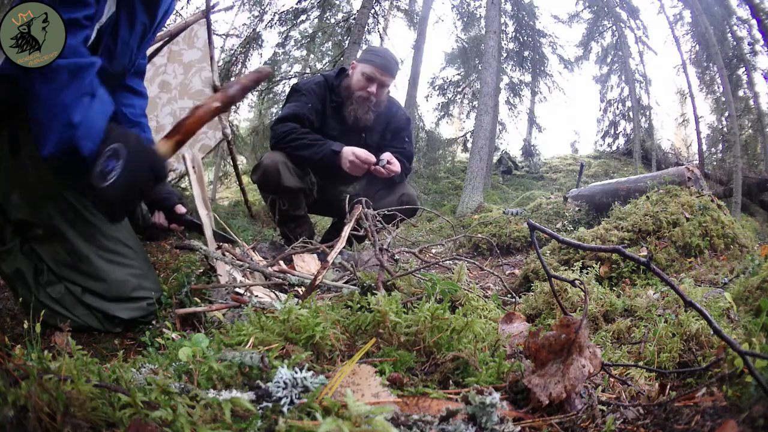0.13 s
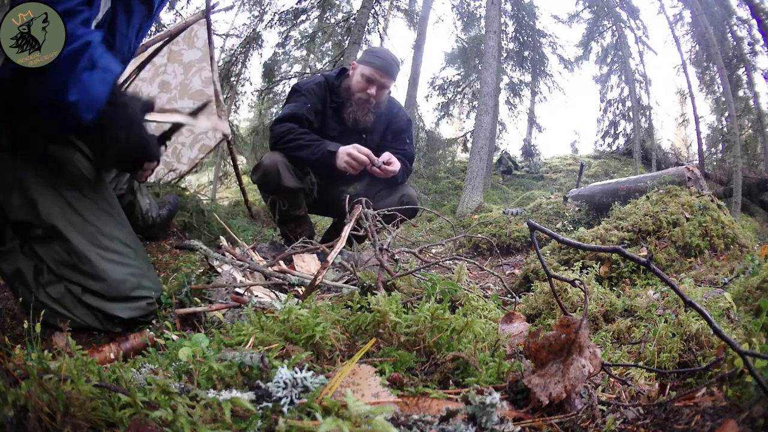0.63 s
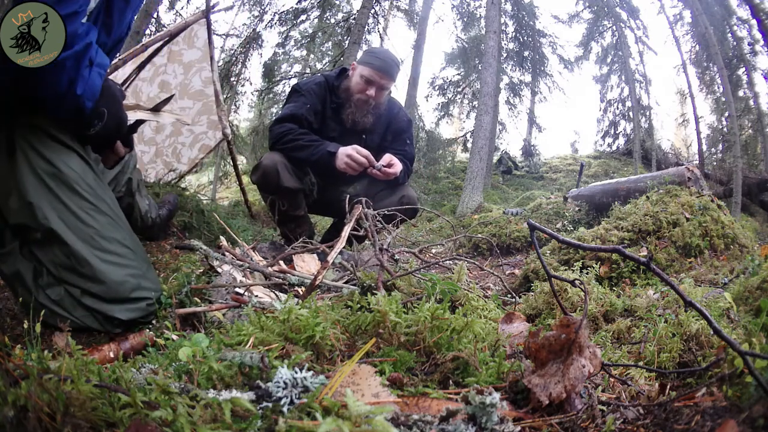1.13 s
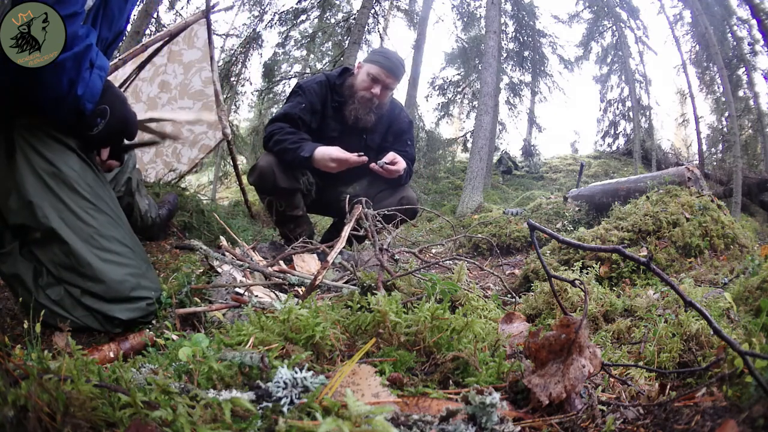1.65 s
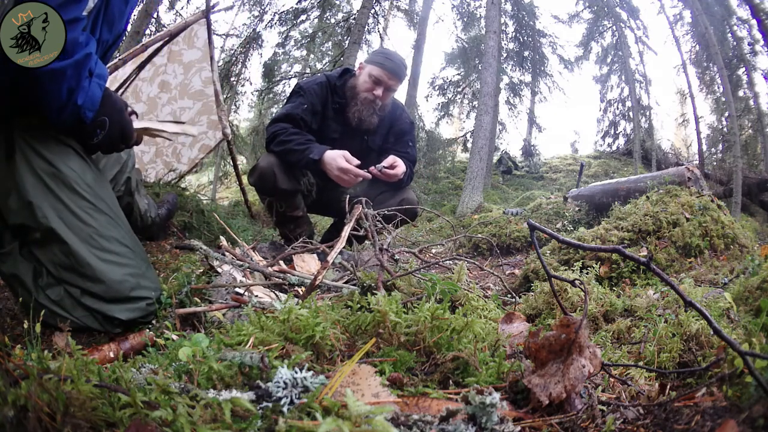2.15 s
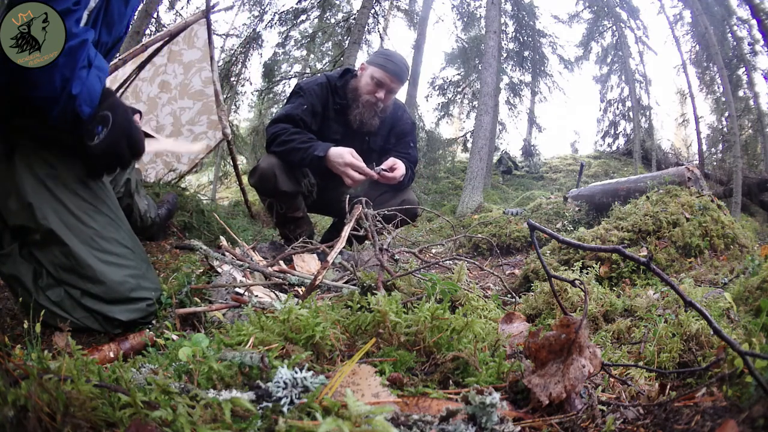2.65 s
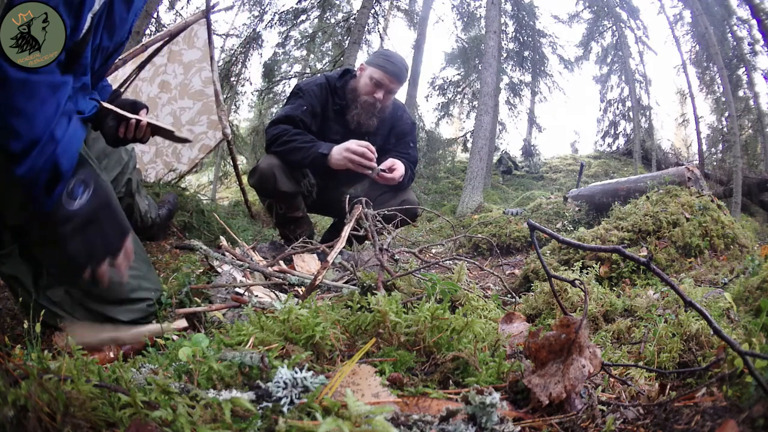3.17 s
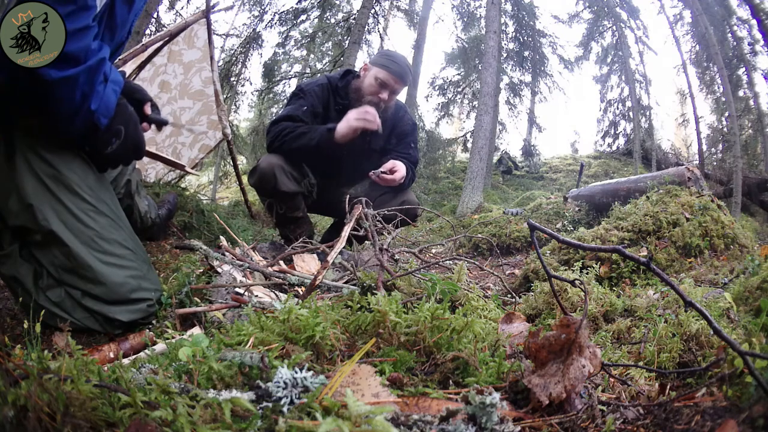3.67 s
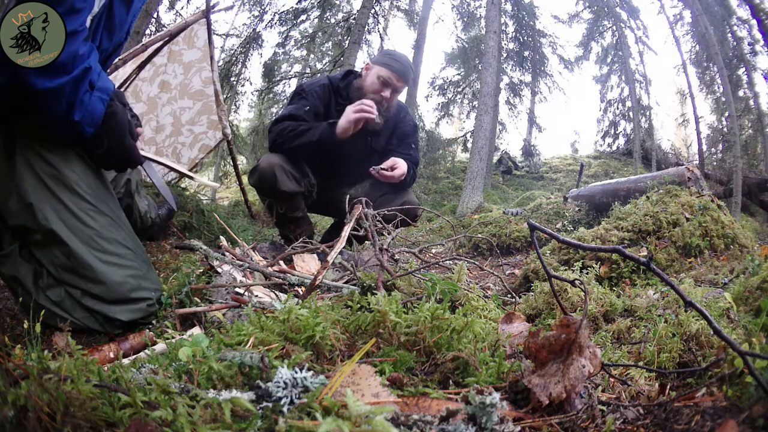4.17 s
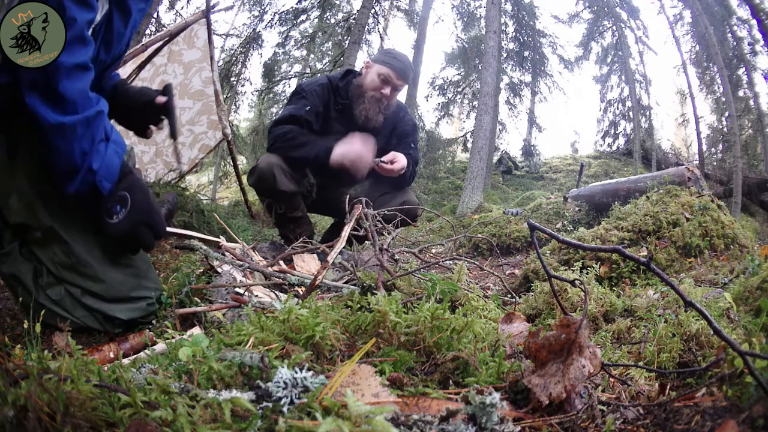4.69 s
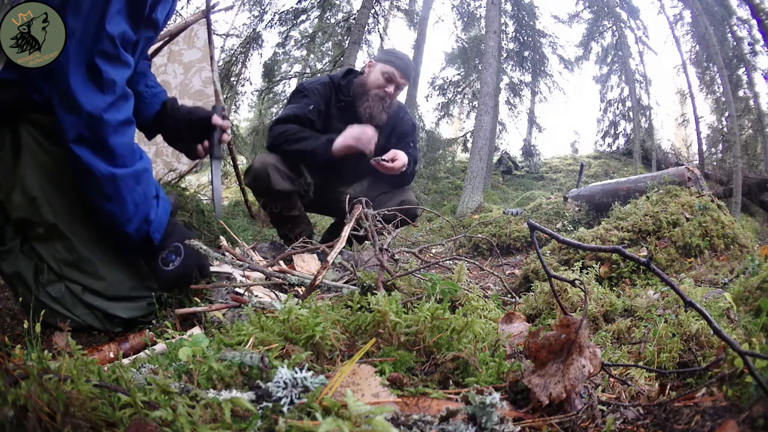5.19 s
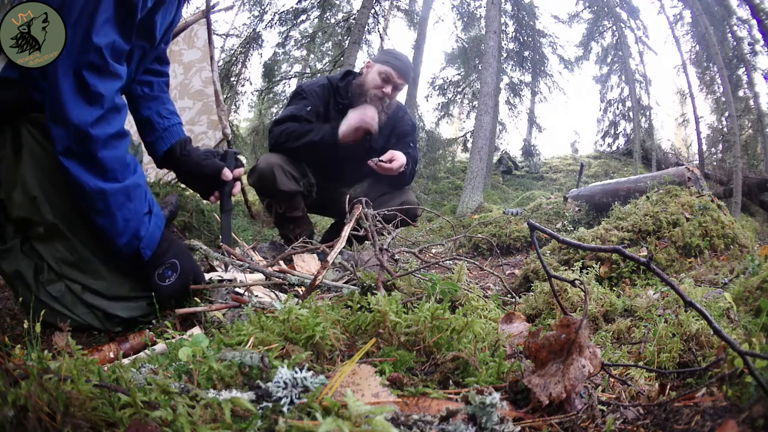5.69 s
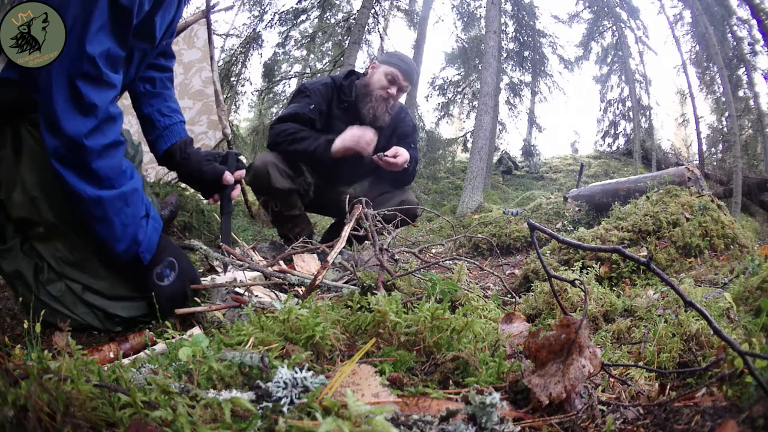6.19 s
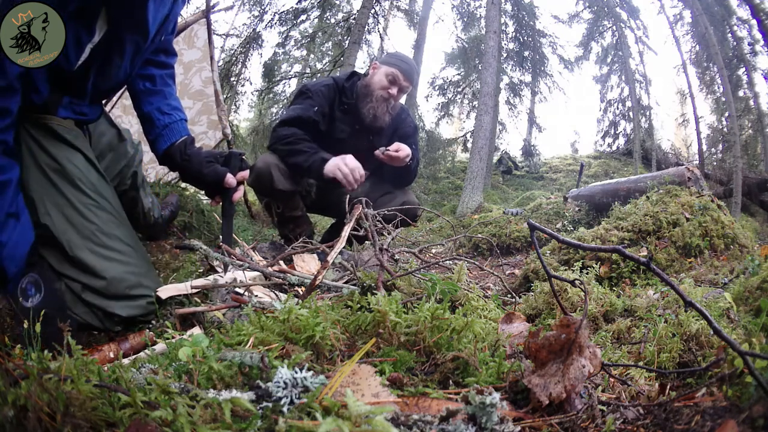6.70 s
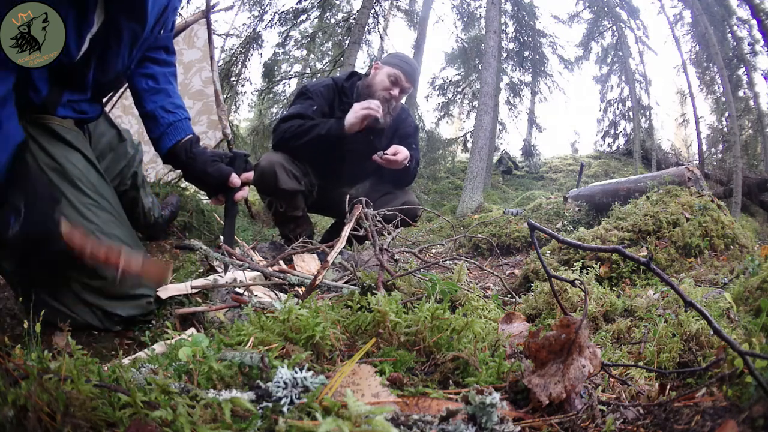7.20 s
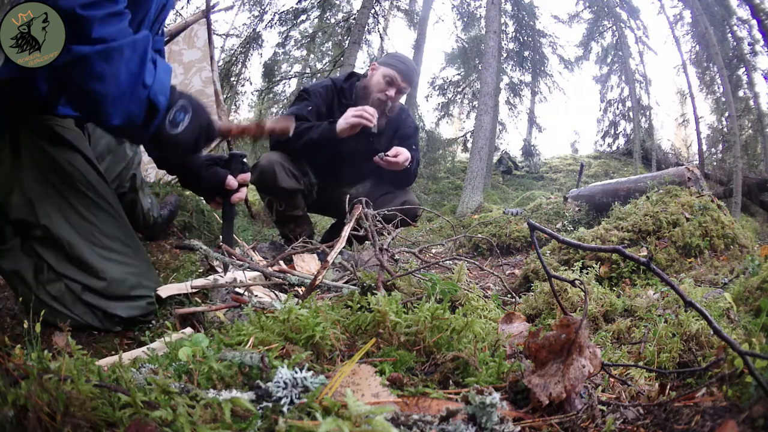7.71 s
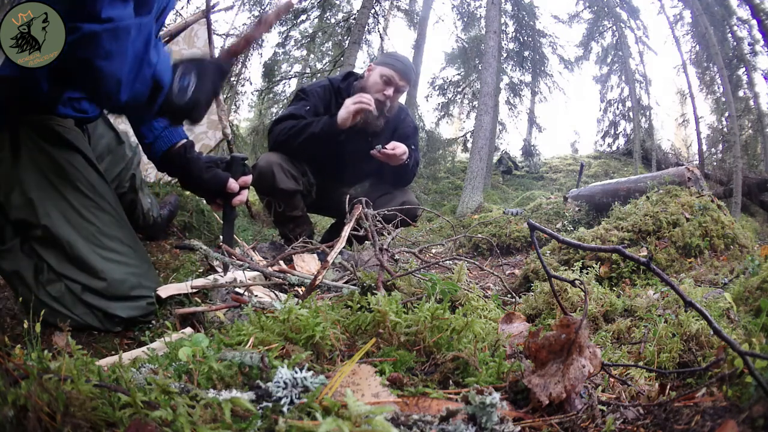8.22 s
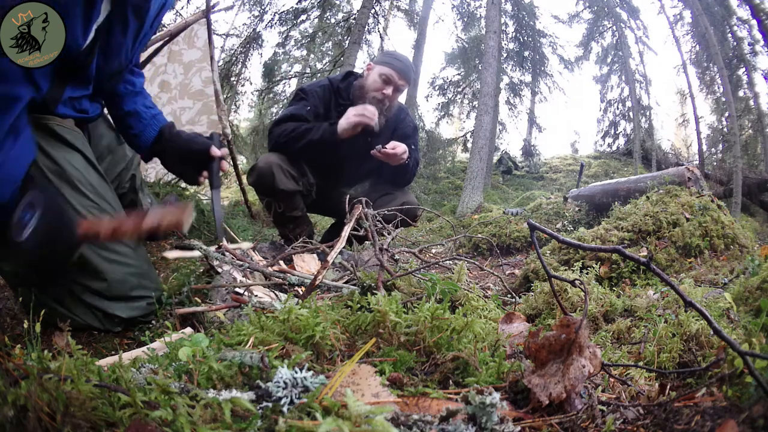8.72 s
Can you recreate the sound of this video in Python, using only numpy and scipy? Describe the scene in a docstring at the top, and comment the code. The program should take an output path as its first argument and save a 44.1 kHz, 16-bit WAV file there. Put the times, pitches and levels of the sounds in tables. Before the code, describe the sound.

A quiet forest heard very close, almost without echo. At first the hush is very faint, with jacket rustle and tiny ticks of fibres and sticks on the left at 0.1-1.2 s. A short tear ends in a loud, bright wood snap at 1.3 s, followed by small crackles and soft drops to 1.75 s. Hush and thin high hiss swell through a calm pause. At 2.97 s a dry stick knocks; around 3.3-3.45 s sticks clack and crackle. Steel scrapes a spark rod ahead at 3.9, 4.3 and 5.15 s, then about every 0.3 s from 5.5 to 7.35 s: hard, dry, bright clicks with a brief rasp. Sticks crack and drop between them, and cloth rustles most around 6.5 s. Three sharp baton blows on a knife hit left at 7.7, 8.0 and 8.4 s, the last tearing wood. Faint rustle and hiss return until about 9 s.

```python
"""A quiet forest, heard close to a fire maker: steel scrapes a spark rod ahead, a baton drives a knife through
kindling on the left, wood cracks and tears, sticks drop on moss and knock, jackets rustle.
Struck bodies are sums of damped modes, fractures are decaying bursts of uneven noise, and the hush,
cloth and hiss are shaped noise. The background drops at listed moments and climbs back at a steady
rate; each of two microphone ports resonates at its own pitches."""
import sys
import numpy as np
from scipy import signal
from scipy.fft import rfft, irfft, next_fast_len
from scipy.io import wavfile
from scipy.ndimage import uniform_filter1d, map_coordinates

SR = 44100
rng = np.random.default_rng(int(sys.argv[2]) if len(sys.argv) > 2 else 0)


def master(y):
    """Save y as 16-bit WAV."""
    cut = np.clip(np.atleast_2d(y).T, -1, 1)
    pcm = np.round(cut * 32767)  # scale
    wavfile.write(sys.argv[1], SR, pcm.astype(np.int16))


def gain_from_decibels(decibels):
    """Convert decibel values to linear amplitude factors."""
    exponent = np.asarray(decibels, float) / 20
    return 10 ** exponent


N = 390285
TIME = np.arange(N) / SR  # seconds, the whole scene
T = np.arange(SR // 5) / SR  # seconds, one short event


def unit(x):
    """Normalization: the signal is scaled to an rms of 1."""
    return x / np.sqrt(np.mean(x ** 2) + 1e-20)


def wobble(rate):
    """Slow random modulation: a smooth curve through random knots, rate knots a second."""
    knots = rng.standard_normal(int(N * rate / SR) + 4)
    return map_coordinates(knots, [np.arange(N) * rate / SR])


def filtered(x, response):
    """Linear filtering: the spectrum is multiplied by a complex response of frequency."""
    m = next_fast_len(N + 8192)
    return irfft(rfft(x, m) * response(np.fft.rfftfreq(m, 1 / SR)), m)[..., :N]


def band(x, low_hz, high_hz, order=2):
    """Causal band-pass filtering."""
    edges = [low_hz, min(high_hz, .49 * SR)]
    return signal.sosfilt(signal.butter(order, edges, "band", fs=SR, output="sos"), x)


def noise(spectrum, alike):
    """Partial coherence: shaped stereo noise of rms 1, alike being the power share common to both sides."""
    hz, db = np.transpose(spectrum)
    common, own = rng.standard_normal(N), rng.standard_normal((2, N))
    pair = np.sqrt(alike) * common + np.sqrt(1 - alike) * own
    return unit(filtered(pair, lambda f: gain_from_decibels(np.interp(np.log(f + 1), np.log(hz), db))))


def add(track, s, sound):
    """Superposition: a sound is summed into the track from time s in seconds."""
    part = track[round(s * SR):][:len(sound)]
    part += sound[:len(part)]


def ring(modes, attack):
    """Modal synthesis: damped sines of slightly random strength under a common attack in seconds."""
    tone = 0
    for hz, db, t60 in modes:
        tone = tone + gain_from_decibels(db + rng.normal() - 60 * T / t60) * np.sin(2 * np.pi * hz * T)
    return tone * (1 - np.exp(-T / attack))


def crackle(t60, rise, spiky_db):
    """Stochastic fracture: a dying burst of uneven impulses whose energy is set by its envelope alone."""
    shape = gain_from_decibels(-60 * T / t60) * (1 - np.exp(-T / rise))
    burst = shape * gain_from_decibels(spiky_db * rng.standard_normal(len(T))) * rng.standard_normal(len(T))
    return burst * np.linalg.norm(shape) / np.linalg.norm(burst)


# Drops of the background, mostly at strikes and blows.
# Each row: start in seconds, level just after in dB (0 = fully swollen).
DUCKS = [(0, -29), (1.308, -19), (3.888, -9), (4.339, -11), (4.6, -9.5), (5.149, -12), (5.498, -10),
         (5.824, -15), (6.147, -15.5), (6.449, -14), (6.75, -12.5), (7.044, -11.5), (7.354, -11.5),
         (7.725, -20), (8.033, -28.5), (8.378, -27.5)]


def swell_db():
    """Linear recovery: after each drop the level climbs at a constant dB rate up to 0 dB."""
    climb_db_per_s, smoothing_s = 10.5, .02
    s, after = np.transpose(DUCKS)
    last = np.clip(np.searchsorted(s, TIME) - 1, 0, None)
    level = np.minimum(0, after[last] + climb_db_per_s * (TIME - s[last]))
    return uniform_filter1d(level, round(smoothing_s * SR))


# Spectrum of the forest hush. Each row: frequency in Hz, relative density in dB per Hz.
HUSH_SPECTRUM = [(20, -44.5), (40, -11.5), (80, -13), (125, 0), (400, -4.5), (1200, -12), (2500, -21),
                 (6000, -35.5), (9000, -49)]
# Hush before the swell. Each row: time in seconds, level in dB.
BREEZE = [(0, -46.5), (1.2, -46), (1.6, -48), (2.9, -46), (3.25, -49.5), (3.8, -47), (4.3, -49),
          (4.6, -53.5), (5.1, -51), (5.6, -44), (6.1, -47.5), (6.45, -48.5), (7.0, -50), (7.7, -45.5),
          (8.0, -45.5), (8.29, -50.5), (8.45, -47.5), (8.85, -46.5)]


def forest_hush():
    """Broadband noise: a partly coherent hush follows a level curve with small random variations."""
    s, db = np.transpose(BREEZE)
    level_db = np.interp(TIME, s, db)
    return gain_from_decibels(level_db + 1.9 * wobble(10)) * noise(HUSH_SPECTRUM, alike=0.34)


# Spectrum of the fine swish of cloth. Each row: frequency in Hz, relative density in dB per Hz.
SWISH_SPECTRUM = [(1500, -20.5), (2500, 2), (5000, 3.5), (8000, -6), (12000, -12), (17000, -30.5)]
# Spectrum of the coarse folds. Each row: frequency in Hz, relative density in dB per Hz.
FOLDS_SPECTRUM = [(200, -27), (600, 0), (1300, -3), (2200, -6), (3500, -28.5)]
# Jacket movements before the swell. Each row: middle in seconds, length between the 1/e amplitude points
# in seconds, fine swish level in dB, coarse folds level in dB.
RUSTLES = [(.02, .15, -52, -46), (0.384, 0.038, -59, -46.5), (.62, .2, -50, -41.5), (0.902, .12, -61, -56),
           (1.08, 0.29, -60.5, -50.5), (1.75, .2, -56.5, -56), (2.45, .25, -71, -80),
           (2.276, 0.077, -62, -56), (2.9, .2, -66, -52.5), (3.33, .15, -58, -47), (3.617, .15, -70, -59.5),
           (3.86, .1, -56.5, -52.5), (4.31, .1, -54.5, -53), (4.448, 0.21, -53, -46.5),
           (4.634, 0.22, -54, -48.5), (4.865, 0.35, -53.5, -46.5), (5.096, 0.22, -52.5, -44),
           (5.23, .15, -58.5, -48), (5.55, .12, -59, -51.5), (5.8, .1, -66.5, -52),
           (6.436, 0.2, -45.5, -40), (6.522, 0.21, -45, -42), (6.86, .15, -49, -42.5),
           (7.23, .25, -54, -53), (7.505, 0.37, -59, -54), (7.668, 0.055, -50.5, -52),
           (7.92, .12, -60, -48.5), (8.6, .3, -57, -52)]


def jackets():
    """Friction noise: uneven grains under bell-shaped swells, whose powers add to a constant small shifting."""
    rest_swish_db, rest_folds_db = -67, -59
    power = gain_from_decibels([[2 * rest_swish_db], [2 * rest_folds_db]])
    for s, length, swish_db, folds_db in RUSTLES:
        bell = np.exp(-8 * ((TIME - s) / length) ** 2)
        power = power + gain_from_decibels([[2 * swish_db], [2 * folds_db]]) * bell
    swish, folds = np.sqrt(power)
    swish_grain_db, folds_grain_db = [1.4 * wobble(25) + 1.8 * wobble(98) for layer in range(2)]
    fine = swish * gain_from_decibels(swish_grain_db) * noise(SWISH_SPECTRUM, alike=0.071)
    return fine + folds * gain_from_decibels(folds_grain_db) * noise(FOLDS_SPECTRUM, alike=0.16)


def ambience():
    """Amplitude modulation: hush and cloth share one swelling level, a little stronger on the left."""
    return (forest_hush() + jackets()) * gain_from_decibels(swell_db() + [[1.2], [-1.2]])


# Spectrum of the electronics' hiss. Each row: frequency in Hz, relative density in dB per Hz.
HISS_SPECTRUM = [(2000, -27.5), (5000, 3), (7000, -7), (10000, -3.5), (12000, -3), (15600, -6.5),
                 (15900, -64)]


def electronics():
    """Electronic self-noise: nearly incoherent hiss and a thin 12 kHz whine share the swelling level."""
    whine = gain_from_decibels(-12 + 1.5 * wobble(1.5)) * np.sin(2 * np.pi * 12000 * TIME)
    tone_and_hiss = noise(HISS_SPECTRUM, alike=0.016) + whine * gain_from_decibels([[1.5], [-1.5]])
    return gain_from_decibels(swell_db() - 56) * tone_and_hiss


def fractures(rows):
    """Brittle fracture: each crack sums a bright snap, a longer woody body and a shorter treble spray."""
    snap, body, treble = np.zeros((3, N))
    for s, db, body_db, treble_db, t60 in rows:
        add(snap, s, gain_from_decibels(db - 5.0) * crackle(t60, rise=0.00046, spiky_db=6.5))
        add(body, s, gain_from_decibels(db + body_db + 11.0) * crackle(1.4 * t60, rise=0.00033, spiky_db=-1.5))
        add(treble, s, gain_from_decibels(db + treble_db + 7.5) * crackle(0.69 * t60, rise=0.0015, spiky_db=5))
    bright = band(snap, 4000, 5800) + gain_from_decibels(-3) * band(snap, 2000, 4000)
    return bright + band(body, 230, 1100) + band(treble, 4700, 12000, order=4)


# Fibres cracking and sticks ticking. Each row: start in seconds, relative level in dB, body in dB and
# treble in dB relative to it before fixed offsets, t60 of the snap in seconds.
CRACKS = [(0.118, -48, -34, -28, 0.017), (0.4983, -44, -15, -25, 0.054), (0.5745, -43.5, -13, -21, 0.072),
          (0.7733, -38, -11, -25, 0.017), (0.7842, -55.5, 10.5, -23, 0.078), (0.8138, -55, 2, -19, 0.077),
          (0.8883, -42.5, -17, -19, 0.014), (1.052, -44.5, -12, -29, 0.057),
          (1.244, -36, -25.5, -10.5, 0.029), (1.305, -7.5, -24.5, -16, 0.025),
          (1.317, -23.5, -6.5, -32, 0.014), (1.5309, -52, -18, -12, 0.025), (1.574, -54, -11, -7, 0.027),
          (1.6174, -44, -11, -21, 0.033), (1.6909, -42, -0.5, -23.5, 0.0495), (1.7, -36.5, -11, -32, 0.025),
          (1.7085, -46, -5, -22, 0.068), (2.903, -48, -25, 1.5, .03), (3.254, -29.5, -12.5, -24, 0.049),
          (3.3051, -29.5, -7, -29, 0.072), (3.3844, -29, -10, -21, 0.02), (3.4436, -27.5, -16, -32, 0.035),
          (4.597, -27, -25, -26, 0.058), (4.6105, -31.5, -10, -31.5, 0.047),
          (4.8849, -43.5, 6.5, -22.5, 0.021), (5.009, -44.5, -3, -34, 0.032),
          (5.691, -42.5, -12, -16, 0.032), (5.748, -32.5, -5, -44, 0.016), (7.0168, -33.5, -7, -12, 0.0085),
          (7.8621, -49, -2, -25, 0.022), (8.0728, -35.5, -22.5, -23, 0.022),
          (8.3953, -21.5, -28, -14.5, 0.027), (8.4666, -48.5, -31, -15, 0.064),
          (8.5202, -51.5, -24, -29, 0.0274)]


def kindling():
    """Impulsive excitation: separate fractures of fibres and sticks."""
    return fractures(CRACKS)


# Drops on moss. Each row: start in seconds, level in dB, final pitch in Hz, t60 in seconds.
DROPS = [(0.508, -49, 66.3, 0.064), (0.581, -42, 58, 0.13), (1.695, -44, 430, 0.038),
         (1.749, -41, 615, 0.031), (4.448, -41.5, 322, 0.039), (4.808, -46, 214, 0.052),
         (4.883, -44.5, 357, 0.078), (5.744, -37, 410, 0.057), (5.954, -50, 340, 0.066)]


def drops():
    """Damped oscillation: a soft landing is one decaying swing that starts fast and sags to its pitch."""
    out = np.zeros(N)
    for s, db, hz, t60 in DROPS:
        turns = hz * T + .9 * (1 - np.exp(-hz * T / .6))
        add(out, s, gain_from_decibels(db - 60 * T / t60) * np.sin(2 * np.pi * turns))
    return out


# Wood tearing. Each row: start in seconds, length in seconds, first relative level in dB,
# last relative level in dB, treble in dB relative to each crack before a fixed offset.
TEARS = [(1.263, .042, -45.5, -25.5, -11.5), (8.397, .021, -25, -29, -3.5)]


def tearing():
    """Successive fracture: rows of small cracks at uneven gaps, their level sliding from first to last."""
    gap_s, t60_s, scatter_db = .004, 0.015, 1
    rows = []
    for s, length, first, last, treble_db in TEARS:
        for k in np.arange(0, length, gap_s):
            start = s + k + gap_s * rng.random()
            db = first + (last - first) * k / length + scatter_db * rng.normal()
            rows.append((start, db, -32, treble_db, t60_s))
    return fractures(rows)


# Spits. Each row: time in seconds (they sound 0.6 ms later), top in dB and bottom in dB before fixed offsets.
SPITS = [(1.3071, -7, -50.5), (3.8869, 1, -49.5), (4.3369, 1, -44.5), (5.1468, -22, -51),
         (5.8215, 7.5, -46), (6.146, -18, -76), (7.7231, -8.5, -49), (8.0305, -7, -41), (8.3749, -39, -44)]


def spits():
    """Sum and difference stereo: bursts of extreme treble and low ticks, rather stronger in opposite sense."""
    top, bottom = np.zeros((2, 2, N))
    for s, top_db, bottom_db in SPITS:
        for k in range(2):
            add(top[k], s + .0006, gain_from_decibels(top_db + 24.5) * crackle(0.00059, rise=0.0016, spiky_db=1.0))
            add(bottom[k], s + .0006, gain_from_decibels(bottom_db + 40) * crackle(0.0028, rise=0.00011, spiky_db=1.0))
    mid, side = band(top, 12500, 16700, order=4) + band(bottom, 100, 1200, order=1)
    return mid + 1.2 * side * np.array([[1], [-1]])


# Thin squeaks. Each row: middle in seconds, length between the 1/e amplitude points in seconds,
# pitch in Hz, level in dB.
SQUEAKS = [(1.642, 0.055, 5330, -67.5), (2.194, .025, 5350, -69), (6.56, 0.03, 4130, -59)]


def squeaks():
    """Frictional whistle: a short tone of randomly modulated amplitude and phase."""
    out = np.zeros(N)
    for s, length, hz, db in SQUEAKS:
        bell = np.exp(-4 * ((TIME - s) / length) ** 2)
        tone = np.sin(2 * np.pi * hz * TIME + .5 * wobble(90))
        out += gain_from_decibels(db + 2.3 * wobble(50)) * bell * tone
    return out


# Knocks on a dry stick. Each row: start in seconds, relative level in dB.
TAPS = [(2.973, -33.5), (3.379, -23), (7.145, -31)]
# Modes of the stick. Each row: frequency in Hz, relative level in dB, t60 in seconds.
STICK_MODES = [(417, -18.5, 0.16), (728, -4, 0.086), (1060, -7, 0.025), (1634, -3, 0.0074)]


def dry_stick():
    """Free vibration of a bar: a knocked stick rings lower and longer than the baton."""
    out = np.zeros(N)
    for s, db in TAPS:
        add(out, s, gain_from_decibels(db - 1.0) * ring(STICK_MODES, attack=0.00057))
    return out


# Baton blows. Each row: start in seconds, relative level in dB, then ring in dB, body in dB and
# clack in dB relative to it before fixed offsets.
BLOWS = [(3.2988, -20.5, -5.5, -6.5, -2.5), (7.7229, -8, -10.5, -15, -20.5),
         (8.0302, -7, -13.5, -19, -17.5), (8.3751, -10, -16.5, -20, -18.5)]
# Modes of the baton. Each row: multiple of the main pitch, relative level in dB, t60 in seconds.
BATON_MODES = [(.51, 0, .017), (.6, 0, .015), (.68, -5, .03), (1, 0, .029)]
# Modes of the knife blade. Each row: frequency in Hz, relative level in dB, t60 in seconds.
BLADE_MODES = [(4350, -4, .007), (5250, 0, .007), (6070, -23, .04), (7080, -26, .035), (8200, -28, .03)]


def baton():
    """Impact excitation: a blow snaps on the knife's back, clacks and sets the baton's modes ringing."""
    main_hz = 1084
    wood, snap, clack = np.zeros((3, N))
    for s, db, ring_db, body_db, clack_db in BLOWS:
        modes = []
        for k, level, t60 in BATON_MODES:
            part_db = body_db if k < 1 else ring_db  # modes below the main pitch form the body
            modes.append((k * main_hz, level + part_db, t60))
        add(wood, s, gain_from_decibels(db + 9) * ring(modes, attack=0.0011))
        add(clack, s, gain_from_decibels(db + clack_db + 15.0) * crackle(0.015, rise=0.00019, spiky_db=9.5))
        add(snap, s, gain_from_decibels(db - 1.0) * ring(BLADE_MODES, attack=0.0011))
        add(snap, s, gain_from_decibels(db - 3.5) * crackle(0.0029, rise=0.00021, spiky_db=5.5))
        add(snap, s, gain_from_decibels(db - 30) * crackle(0.05, rise=.002, spiky_db=2.5))
    return wood + band(snap, 3200, 11000) + band(clack, 1400, 2600)


# Steel on the spark rod. Each row: start in seconds, relative level of the bite in dB, chatter in dB
# relative to it, brightness in dB relative to it before fixed offsets, t60 of the chatter in seconds.
STRIKES = [(3.8857, -5, -9.5, -15.5, 0.023), (4.337, -5, -7.5, -16, 0.026), (5.1478, -4.5, -6.5, -9, 0.012),
           (5.4967, -5.5, -16.5, -19, 0.033), (5.8221, -9.5, 1.5, -14.5, 0.015),
           (6.1452, -9.5, 1, -19, 0.019), (6.4473, -8.5, -8.5, -14.5, 0.024),
           (6.452, -14.5, -12.5, -16, 0.013), (6.7479, -10.5, -1.5, -17, 0.025),
           (7.0427, -7.5, -5, -22.5, 0.03), (7.051, -22, -7, -10.5, 0.0118), (7.3528, -7, 2, -22, 0.01),
           (7.3571, -18.5, -7, -8.5, 0.025), (7.3623, -16.5, -3.5, -4.5, 0.019)]
# Modes of the rod. Each row: frequency in Hz, relative level in dB, t60 in seconds.
ROD_MODES = [(2993, 2, 0.017), (2450, -5, 0.016)]
# Modes of the steel. Each row: frequency in Hz, relative level in dB, t60 in seconds.
STEEL_MODES = [(10800, 4.5, 0.021), (10080, -12.5, 0.02)]


def spark_rod():
    """Scraping excitation: a hard click and chatter leave rod and steel ringing, the steel more on the right."""
    scrape, treble, rod, steel = np.zeros((4, N))
    for s, db, chatter_db, bright_db, t60 in STRIKES:
        bite = 1.7 * np.exp(-T / .00004) + .6 * crackle(0.0014, rise=0.00049, spiky_db=0.5)
        burst = bite + gain_from_decibels(chatter_db) * crackle(t60, rise=0.00061, spiky_db=7.5)
        add(scrape, s, gain_from_decibels(db - 3.5) * burst)
        add(treble, s, gain_from_decibels(db + bright_db + 9) * burst)
        add(rod, s, gain_from_decibels(db - 18.0) * ring(ROD_MODES, attack=0.0012))
        add(steel, s, gain_from_decibels(db + bright_db - 4.0) * ring(STEEL_MODES, attack=0.0017))
    scraping = band(scrape, 3060, 6180) + gain_from_decibels(-12) * band(scrape, 1700, 3500)
    return rod + scraping + band(treble, 7350, 11420, order=4) + steel * gain_from_decibels([[-3], [3]])


def trees(x):
    """Diffuse reverberation: a short decaying answer from ground and trunks, different on each side."""
    tail = rng.standard_normal((2, len(T))) * gain_from_decibels(-60 * T / 0.25)
    delayed = np.pad(x, (300, 0))[None]  # 300 samples before the first return
    return signal.fftconvolve(delayed, tail / np.linalg.norm(tail[0]), axes=1)[:, :N]


def scene():
    """Interaural-style cues: sounds from the left are stronger at the left port and reach it first."""
    left = kindling() + drops() + tearing() + squeaks() + dry_stick() + baton()
    ahead = spark_rod()
    lag_s = np.array([[0], [.00007]])
    left_pair = filtered(left * gain_from_decibels([[.8], [-.8]]), lambda hz: np.exp(-2j * np.pi * hz * lag_s))
    direct = ahead * gain_from_decibels([[-.4], [.4]]) + left_pair + spits()
    return direct + gain_from_decibels(-39.0) * trees(ahead[0] + left) + ambience()


def port(hz, peaks):
    """Resonance: the causal response of one port is a chain of second-order lifts and dips."""
    response = 1
    for centre, width, db in peaks:
        resonance = 1j * hz * width / (centre * centre - hz * hz + 1j * hz * width)
        response = response * (1 + (gain_from_decibels(db) - 1) * resonance)
    return response


# Left port resonances. Each row: centre in Hz, width in Hz, gain at the centre in dB.
LEFT_PORT = [(2990, 340, 6.5), (4120, 270, 9), (5180, 560, 14.5), (8400, 5400, -14.5)]
# Right port resonances. Each row: centre in Hz, width in Hz, gain at the centre in dB.
RIGHT_PORT = [(3270, 170, 4.8), (4340, 370, 13.9), (5740, 600, 2.4), (8330, 1100, 10.5)]


def microphone_ports(dry):
    """Linear filtering: each side passes through the resonances of its own port."""
    return filtered(dry, lambda hz: [port(hz, LEFT_PORT), port(hz, RIGHT_PORT)])


def roll_off(x):
    """The treble ends steeply here."""
    return signal.sosfilt(signal.butter(12, 17490, fs=SR, output="sos"), x)


def record(dry):
    """Signal chain: port resonances, added electronic noise, then clipping at full scale."""
    mix = np.clip(microphone_ports(dry) + electronics(), -1, 1)
    return roll_off(mix)


dry = scene()
out = record(dry)
master(out)
```